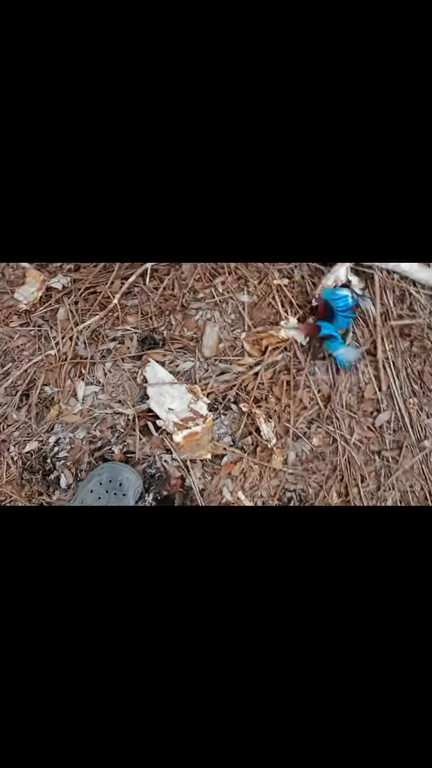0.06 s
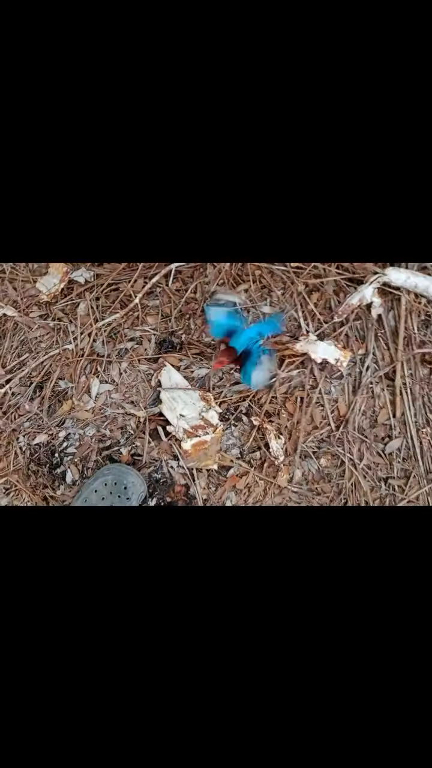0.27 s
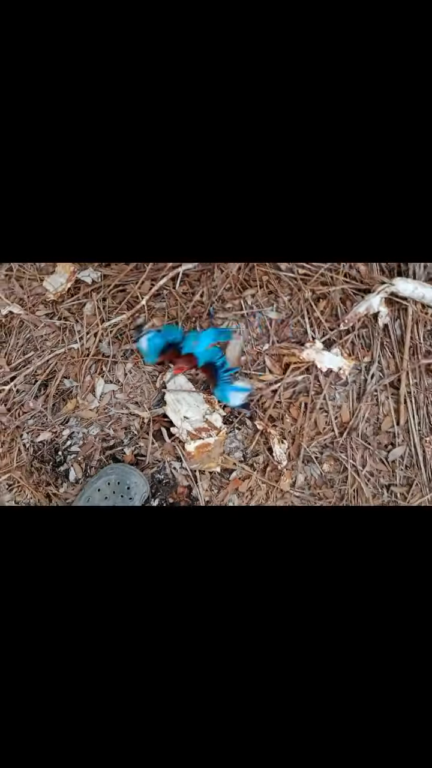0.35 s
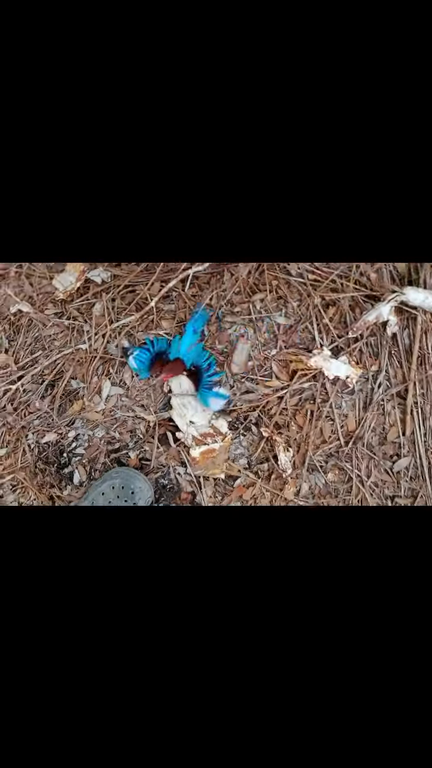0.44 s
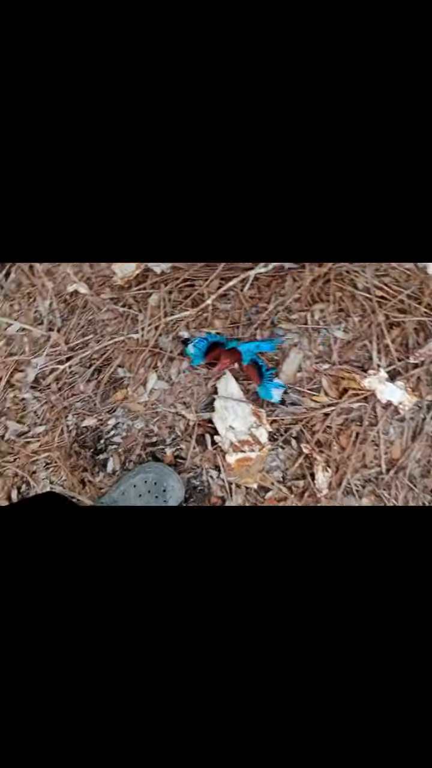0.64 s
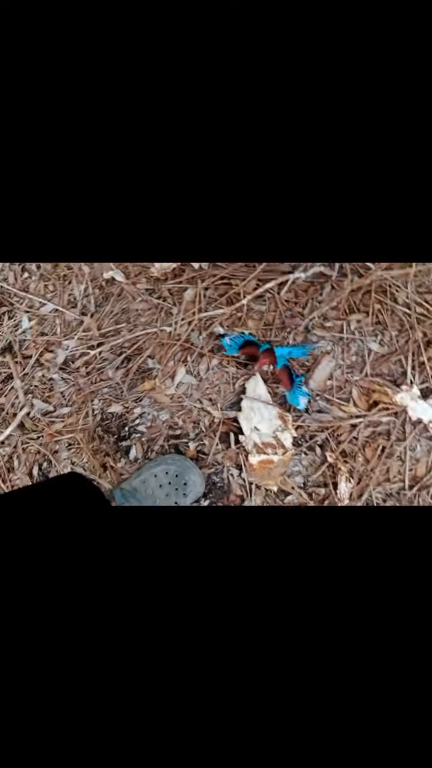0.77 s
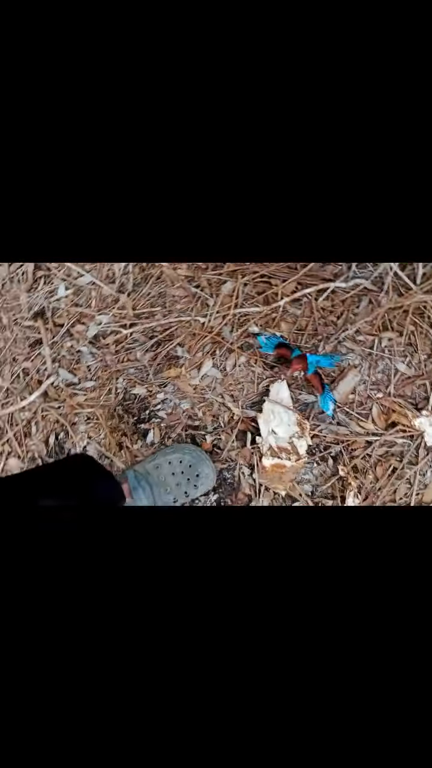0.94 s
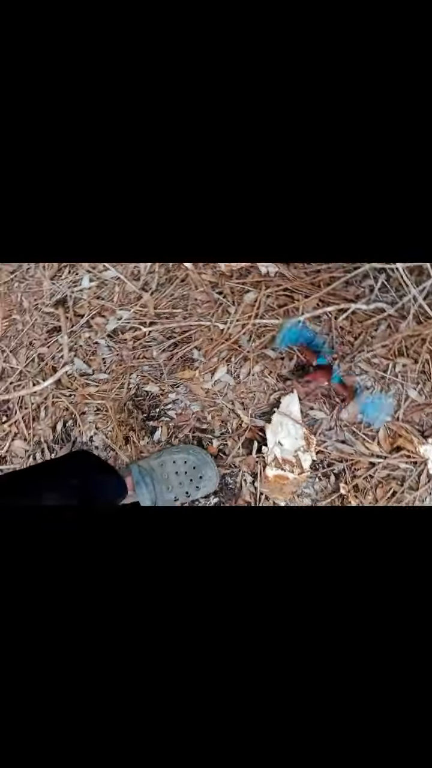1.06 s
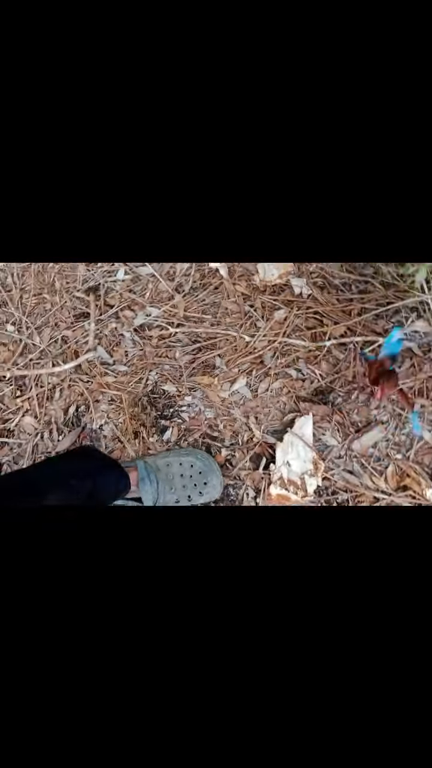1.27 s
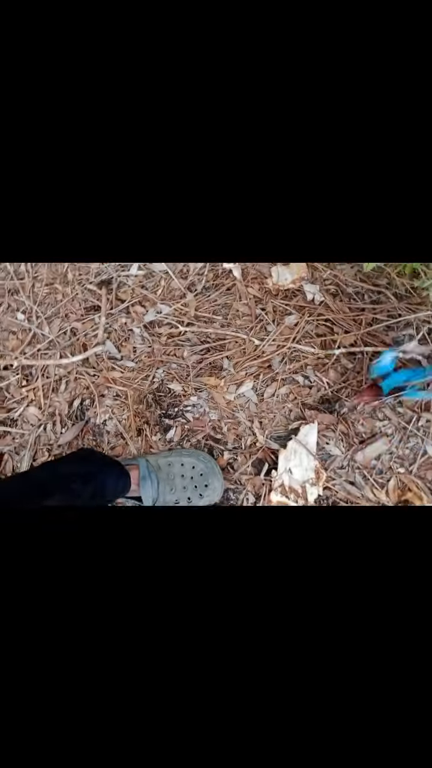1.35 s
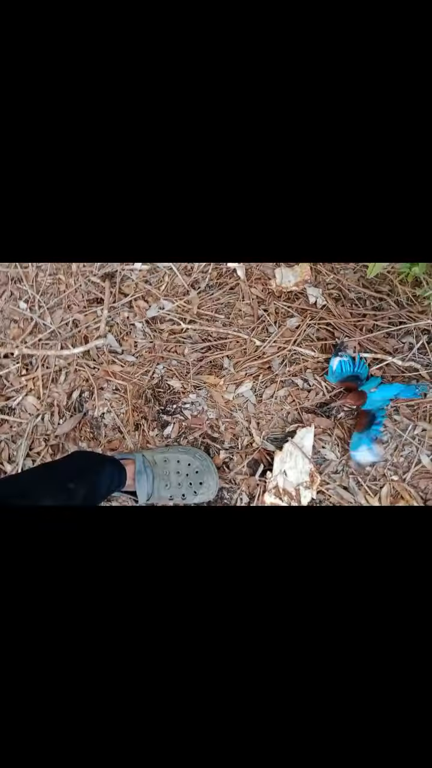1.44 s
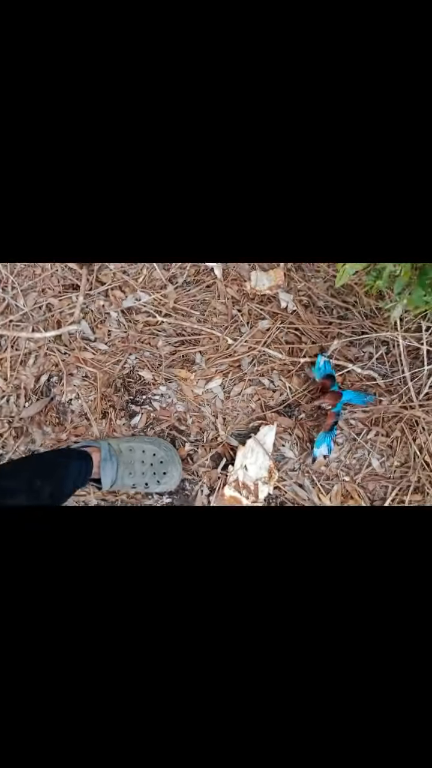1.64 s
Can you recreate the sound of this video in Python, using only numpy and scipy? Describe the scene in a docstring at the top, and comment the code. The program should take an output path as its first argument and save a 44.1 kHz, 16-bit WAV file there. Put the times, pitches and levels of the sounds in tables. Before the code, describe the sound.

Dry leaves rustle and twigs snap close by from about 0.1 seconds as a bird thrashes. Near 0.3 seconds it gives one short, harsh, reedy squawk over soft wingbeats. The crackling thins out, and faint, distant bird whistles follow around 0.8 seconds. A footstep crunches loudly at 1.0 to 1.1 seconds, then scrabbling and small snaps continue, fading by 1.7 seconds in quiet outdoor air.

```python
"""Dry leaves rustle close by as a bird thrashes on the litter, snapping twigs and beating its wings.
It lets out one short, harsh squawk, a reedy tone that jumps between a clean and a ragged register.
The leaves settle, a small bird whistles far off, then a footstep crunches and the bird scrabbles on.
The rustle is thousands of tiny fractures over a brushing noise; each snap is a crack and a wooden knock.
The trees give a faint echo, and a quiet bed of air lies under it all."""
import sys
import numpy as np
from scipy import signal
from scipy.fft import rfft, irfft, next_fast_len
from scipy.io import wavfile
from scipy.ndimage import uniform_filter1d, map_coordinates

SR = 44100
rng = np.random.default_rng(int(sys.argv[2]) if len(sys.argv) > 2 else 0)


def dump(signal):
    """Clip the signal to [-1, 1] and save it as 16-bit WAV at the path in sys.argv[1]."""
    limited = np.clip(np.atleast_2d(signal).T, -1, 1)
    pcm = np.round(limited * 32767).astype(np.int16)
    wavfile.write(sys.argv[1], SR, pcm)


N = 74970

# Tone of the still air: frequency_hz, gain_db
AIR_EQ = [(20, -19), (45, -9), (80, 3), (150, -8), (400, -16.5), (1500, -20.5), (2600, -16), (5000, -24.5),
          (15000, -39)]
# Fader rides for the four moves on the litter, before trim: time_s, leaf_db, twig_db
FLURRY_RIDE = [(0.008, -66.5, -86), (0.018, -49, -84), (0.032, -55, -71.5), (0.056, -47, -76),
               (0.082, -41.5, -50), (0.094, -31, -43), (0.106, -38.5, -48), (0.114, -32.5, -42.5),
               (0.132, -42, -50.5), (0.172, -41.5, -54.5), (0.18, -30.5, -35), (0.188, -26, -40.5),
               (0.206, -30, -49), (0.222, -49.5, -49.5)]
SETTLING_RIDE = [(.33, -60, -52), (0.377, -54, -81), (0.385, -40, -56), (.408, -41, -47),
                 (.422, -37, -43.5), (0.436, -32.5, -49.5), (0.451, -49, -61.5), (.495, -46, -57.5),
                 (0.514, -42.5, -57), (.55, -56.5, -62), (0.573, -42.5, -68), (.6, -54.5, -70.5),
                 (.66, -56.5, -71.5), (.73, -61, -78), (.77, -73, -91), (.94, -74, -95)]
FOOTSTEP_RIDE = [(0.955, -64.5, -93), (0.963, -55, -71), (0.991, -32.5, -43), (1.033, -25, -33.5),
                 (1.077, -31, -34.5), (1.083, -26, -31.5), (1.093, -26.5, -41), (1.113, -25.5, -31),
                 (1.142, -45.5, -65)]
SCRABBLE_RIDE = [(1.149, -37, -46), (1.18, -39.5, -47), (1.2, -44, -55), (1.245, -45, -54),
                 (1.266, -36, -52), (1.295, -40, -57), (1.325, -38, -44), (1.37, -42, -48.5),
                 (1.405, -40, -43), (1.431, -33.5, -44), (1.455, -40, -49.5), (1.5, -47, -56.5),
                 (1.527, -46, -55.5), (1.56, -49.5, -55.5), (1.605, -45.5, -60.5), (1.635, -54.5, -58),
                 (1.668, -53, -68), (1.68, -50.5, -69), (1.7, -54.5, -70)]
# Tone of crisp leaves, and of the twigs and soil beneath: frequency_hz, gain_db
LEAF_EQ = [(880, -36), (1500, -7), (1750, -9.5), (2220, -5.5), (2670, -4), (3410, -4.5), (3720, -5.5),
           (4660, -7.5), (8370, 1.5), (10200, -11), (12300, -17), (14900, -16.5), (15500, -17)]
TWIG_EQ = [(71, -25), (120, -21), (368, -13.5), (584, -1.5), (718, -5), (1150, 0.5), (1240, -1),
           (1660, -12.5), (2200, -5), (2860, -33), (4840, -120)]
# Echo decay among the trees: frequency_hz, t60_s
TREE_DECAY = [(200, 0.18), (1500, 0.36), (4000, 0.59), (9000, .5), (15000, 0.31)]
# Snapping stalks, before trim: start_s, crack_db, knock_db, knock_hz
SNAP_CUES = [(0.0925, -20, -46, 900), (0.114, -30, -33, 790), (0.1817, -14.5, -26.5, 480),
             (.194, -16.5, -32, 700), (.415, -37, -25.5, 496), (.4205, -14, -40, 770),
             (0.434, -21, -39, 1500), (0.486, -33, -55, 2000), (.575, -32, -58, 2000),
             (.6352, -24.5, -33.5, 1600), (.655, -31.5, -46, 1510), (0.6836, -53, -39, 1940),
             (.714, -36.5, -59, 1990), (.743, -42, -65, 3970), (.774, -34, -40, 1620),
             (.803, -44, -65, 4200), (.849, -42, -43.5, 3380), (0.8973, -46, -44, 4580),
             (1.0356, -18, -18.5, 975), (1.038, -12, -25, 1090), (1.078, -17, -36, 885),
             (1.083, -23.5, -14.5, 520), (1.0963, -22, -26, 700), (1.1043, -18, -23.5, 704),
             (1.113, -27.5, -16.5, 525), (1.1233, -18, -22.5, 557), (1.132, -19, -46, 900),
             (1.15, -20.5, -40, 695), (1.183, -18.5, -39, 810), (1.1995, -27, -45, 1190),
             (1.261, -29, -27, 1010), (1.273, -27.5, -27, 1100), (1.3131, -24, -27, 900),
             (1.321, -19.5, -24, 1720), (1.331, -22, -23, 750), (1.3425, -19, -15, 632),
             (1.357, -20, -26, 2200), (1.3949, -34, -24.5, 700), (1.4037, -21, -27, 1230),
             (1.434, -31, -29, 1930), (1.441, -21.5, -35, 800), (1.523, -30.5, -30.5, 1450),
             (1.531, -33, -32.5, 1190), (1.577, -41, -34, 2560), (1.609, -27, -31.5, 1540),
             (1.678, -30.5, -40, 1380)]
# Tone of a crack: frequency_hz, gain_db
CRACK_EQ = [(800, -21.5), (1500, -8.5), (2700, -4), (4600, -2.5), (8400, 0.5), (10200, -10.5),
            (12300, -24.5), (15500, -28)]
# Ringing modes of a twig: pitch_ratio, gain_db
TWIG_MODES = [(1, -0.5), (1.4, 0.5), (1.85, -1), (3, -6)]
# Hollow ground scrapes, and soft thuds of pushed air: peak_s, half_length_s, level_db
SCRAPE_CUES = [(.15, 0.019, -56), (.19, 0.015, -45), (.47, 0.025, -66), (1.095, .035, -43),
               (1.18, 0.037, -64.5), (1.425, 0.053, -54.5), (1.59, 0.047, -63)]
THUD_CUES = [(.192, .014, -48), (.252, 0.017, -36), (0.27, 0.0074, -38.5), (0.302, .016, -45),
             (1.092, 0.05, -54.5), (1.26, 0.022, -69)]
# Tone of a scrape and of a thud: frequency_hz, gain_db
SCRAPE_EQ = [(80, -24), (200, -8), (330, -4), (460, 2), (620, -6.5), (1200, -33), (3000, -69)]
THUD_EQ = [(20, -18), (60, -7), (110, -4), (200, -7.5), (400, -12.5), (1000, -13.5), (3000, -56)]
# The squawk's jumping voice: time_s, pitch_hz, roughness_share
SQUAWK_CONTOUR = [(.226, 1450, .9), (.239, 1800, .45), (.245, 1660, .2), (.2495, 1720, .2),
                  (.252, 1930, .45), (.2526, 2200, .2), (.257, 2245, .06), (.262, 2265, .02),
                  (.266, 2215, .08), (.2725, 2170, .12), (.2732, 1730, .2), (.277, 1680, .4),
                  (.279, 1750, .8), (.2815, 2130, .15), (.287, 2070, .1), (.2935, 1940, .3),
                  (.2955, 1450, .8), (.3, 1680, .35), (.3075, 1870, .12), (.309, 2260, .1),
                  (.316, 2220, .02), (.322, 2120, .12), (.3235, 1600, .3), (.336, 1400, .9)]
# Fader ride on its two resonances, before trim: time_s, low_db, high_db
SQUAWK_RIDE = [(.226, -34, -35), (.233, -29, -30), (.236, -35, -38), (.241, -22, -26), (.244, -18.5, -17),
               (.249, -16, -14), (.2515, -10.5, -20), (.255, -11.5, -17), (.259, -11.5, -28),
               (.2635, -12, -28), (.266, -18, -13), (.272, -24, -13.5), (.2745, -14, -18), (.28, -21, -20),
               (.286, -22, -19.5), (.292, -17, -17.5), (.296, -24, -20), (.301, -17, -16.5),
               (.307, -14, -20), (.31, -19, -15.5), (.318, -18, -15), (.322, -25, -14), (.325, -19, -21),
               (.329, -29, -25), (.336, -38, -39)]
# Period doubling in mid-squawk: time_s, doubling_share
DOUBLING_RIDE = [(.272, 0), (.281, 1), (.291, 1), (.298, 0)]
# Partials of the low resonance, the high one and the doubled period: pitch_ratio, gain_db
LOW_STACK = [(1, -33), (2, -10.5)]
HIGH_STACK = [(3, -5), (4, 4.5), (5, -0.5), (6, -3), (7, -16.5)]
DOUBLING_STACK = [(1.5, -10.5), (2.5, -17.5), (3, -5), (3.5, -5.5), (4.5, -10)]
# Tone of the bird's throat: frequency_hz, gain_db
THROAT_EQ = [(300, -36), (1600, -20.5), (2300, -6), (3200, 0.5), (4500, 1.5), (5300, -9), (6600, -3.5),
             (8300, 5.5), (9100, 1), (9550, -20), (11300, -16.5), (13300, -18), (16000, -28)]
# The far bird's notes: start_s, length_s, start_hz, end_hz, level_db
WHISTLE_CUES = [(0.784, .06, 2575, 2620, -57), (0.842, 0.043, 2598, 2570, -58),
                (0.878, 0.062, 3030, 2930, -64), (.92, 0.025, 2610, 2510, -65.5)]


def amp(db):
    """Decibels to gain."""
    return 10 ** (np.asarray(db) / 20)


def unit(x):
    """Scale to rms 1."""
    return x / np.sqrt(np.mean(x ** 2) + 1e-20)


def along(points, hz):
    """Read (frequency_hz, value) points on a log frequency axis."""
    frequencies, values = np.transpose(points)
    return np.interp(np.log(hz + 1), np.log(frequencies + 1), values)


def curves(rows):
    """One automation curve for each column after the time."""
    times, *columns = np.transpose(rows)
    return [np.interp(np.arange(N) / SR, times, column) for column in columns]


def wobble(knots_per_s):
    """A smooth random curve."""
    return map_coordinates(rng.standard_normal(N), [np.arange(N) * knots_per_s / SR], mode="wrap")


def coloured(x, eq):
    """Shape x with a minimum-phase EQ of power gain 1."""
    size = 2 * next_fast_len(N)
    gain = unit(amp(along(eq, np.fft.rfftfreq(size, 1 / SR))))
    cepstrum = irfft(np.log(np.maximum(gain, 1e-5)))
    cepstrum[1:size // 2] *= 2  # folded forward, so nothing rings ahead of a hit
    cepstrum[size // 2 + 1:] = 0
    return irfft(rfft(x, size) * np.exp(rfft(cepstrum)), size)[:N]


def noise(eq):
    """Coloured noise at rms 1."""
    return unit(coloured(rng.standard_normal(N), eq))


def swells(cues):
    """An envelope of soft, bell-shaped rises and falls."""
    t = np.arange(N) / SR
    return sum(amp(db) * np.exp(-((t - peak_s) / half_s) ** 2) for peak_s, half_s, db in cues)


def add(track, start_s, sound):
    """Mix a sound in at its cue."""
    part = track[max(0, round(start_s * SR)):][:len(sound)]
    part += sound[:len(part)]


def still_air(level_db=-71):
    """A steady bed of low rumble and faint hiss."""
    return amp(level_db) * noise(AIR_EQ)


def crackle(eq, grains_per_s, decay_cycles, spread_db=3.5, brush_gain=.75):
    """Tiny fractures, each with its own size and pitch, over a smooth brushing noise; rms 1."""
    count = int(grains_per_s * N / SR)
    t = np.arange(160) / SR
    onset, pick, phase = rng.random((count, 3)).T
    hz = eq[0][0] + pick * (eq[-1][0] - eq[0][0])
    size = amp(spread_db * np.clip(rng.standard_normal(count), -2, 2)) * np.sqrt(hz)
    cycles = hz[:, None] * t
    fade = np.exp(-cycles / decay_cycles) * (1 - t / t[-1])
    rings = size[:, None] * fade * np.sin(2 * np.pi * (cycles + phase[:, None]))
    places = (onset * N).astype(int)[:, None] + np.arange(len(t))
    grains = unit(np.bincount(places.ravel(), rings.ravel(), N)[:N])
    return unit(coloured(grains + brush_gain * rng.standard_normal(N), eq))


def rustle(trim_db=-.5, clump_db=1.27, clumps_per_s=160):
    """Wings and a shoe crush the litter in clumps: crisp leaves on top, duller twigs and soil beneath."""
    leaf_db, twig_db = curves(np.vstack([FLURRY_RIDE, SETTLING_RIDE, FOOTSTEP_RIDE, SCRABBLE_RIDE]))
    leaves = amp(leaf_db) * crackle(LEAF_EQ, grains_per_s=3200, decay_cycles=2)
    twigs = amp(twig_db) * crackle(TWIG_EQ, grains_per_s=1400, decay_cycles=2.5)
    return (leaves + twigs) * amp(trim_db + clump_db * wobble(clumps_per_s))


def tree_echo(x):
    """A diffuse tail off the trees, each frequency dying at its own speed."""
    hz, t, bands = signal.stft(rng.standard_normal(SR // 2), SR, nperseg=256)
    fade = amp(-60 * t / along(TREE_DECAY, hz)[:, None])
    _, tail = signal.istft(bands * fade, SR, nperseg=256)
    return signal.fftconvolve(x, tail / np.linalg.norm(tail))[:N]


def snaps(crack_trim_db=-6.5, knock_trim_db=-7, tail_db=-15, low_cut_hz=360):
    """Each breaking stalk gives a bright crack and a short wooden knock with no bass."""
    crack_t60_s, tail_t60_s, knock_t60_s = .0051, .03, .013
    cracks, knocks = np.zeros((2, N))
    t = np.arange(SR // 20) / SR
    crack_fade = amp(-60 * t / crack_t60_s) + amp(tail_db - 60 * t / tail_t60_s)
    for start_s, crack_db, knock_db, knock_hz in SNAP_CUES:
        add(cracks, start_s, amp(crack_db + crack_trim_db) * crack_fade * rng.standard_normal(len(t)))
        ring = np.zeros(len(t))
        for i, (ratio, db) in enumerate(TWIG_MODES):
            mode_hz = ratio * knock_hz * np.exp(rng.normal(0, .044))  # each twig is a little detuned
            ring += (-1) ** i * amp(db) * np.cos(2 * np.pi * mode_hz * t)
        add(knocks, start_s, amp(knock_db + knock_trim_db - 60 * t / knock_t60_s) * ring)
    low_cut = signal.butter(2, low_cut_hz, "high", fs=SR, output="sos")
    return coloured(cracks, CRACK_EQ) + signal.sosfilt(low_cut, knocks)


def thuds_and_scrapes():
    """Wingbeats and the footfall push air and scrape the hollow ground."""
    return swells(THUD_CUES) * noise(THUD_EQ) + swells(SCRAPE_CUES) * noise(SCRAPE_EQ)


def squawk(start_s=.2255, end_s=.337, trim_db=-1, rasp_db=7):
    """A reedy tone, clean up high and ragged down low, through two throat resonances."""
    jitter, shimmer, flutter_hz = .0817, .73, 1500  # pitch and level scatter at full roughness; rate
    pitch_hz, roughness = curves(SQUAWK_CONTOUR)
    low_db, high_db = curves(SQUAWK_RIDE)
    doubling, = curves(DOUBLING_RIDE)
    ragged_hz = pitch_hz * (1 + jitter * roughness * wobble(flutter_hz))
    phase = 2 * np.pi * np.cumsum(ragged_hz) / SR

    def through_throat(stack):
        """A stack of fluttering partials shaped by the throat, and its rms without the flutter."""
        tone, power = np.zeros((2, N))
        for ratio, db in stack:
            gain = amp(db + along(THROAT_EQ, ratio * pitch_hz))
            flutter = 1 + shimmer * roughness * wobble(2 * flutter_hz)
            tone += gain * flutter * np.sin(ratio * phase)
            power += gain ** 2 / 2
        return tone, np.sqrt(power)

    voice = np.zeros(N)
    for stack, level_db in (LOW_STACK, low_db), (HIGH_STACK, high_db):
        tone, rms = through_throat(stack)
        voice += amp(level_db + trim_db) * tone / rms
    subtones, _ = through_throat(DOUBLING_STACK)
    voice += doubling * amp(high_db) * subtones
    rasp = amp(rasp_db + low_db) * roughness * noise(THROAT_EQ)
    t = np.arange(N) / SR
    soft_gate = uniform_filter1d(1. * ((t > start_s) & (t < end_s)), size=64)
    return (voice + rasp) * soft_gate


def far_bird(waver_share=.018, waver_hz=200, echo_db=-7):
    """Thin, wavering whistles, blurred by the trees."""
    whistles = np.zeros(N)
    for start_s, length_s, start_hz, end_hz, db in WHISTLE_CUES:
        progress = np.linspace(0, 1, int(length_s * SR))
        waver = 1 + waver_share * wobble(waver_hz)[:len(progress)]
        hz = np.interp(progress, [0, 1], [start_hz, end_hz]) * waver
        arch = np.sqrt(np.abs(np.sin(np.pi * progress)))
        add(whistles, start_s, amp(db) * arch * np.sin(2 * np.pi * np.cumsum(hz) / SR))
    return whistles + amp(echo_db) * tree_echo(whistles)


def scene(echo_db=-24.5):
    """The mono mix: close sounds and their echo, thuds and scrapes, the far bird and still air."""
    near = squawk() + rustle() + snaps()
    air = still_air()
    return (near + amp(echo_db) * tree_echo(near) + thuds_and_scrapes() + far_bird() + air)[None]


def record(dry):
    """A soft clip rounds off the highest peaks, then a steep high cut takes off the very top."""
    ceiling, top_hz, taper_hz = .52, 15900, 400
    rounded = dry / (1 + np.abs(dry / ceiling) ** 8) ** (1 / 8)
    size = next_fast_len(N + SR // 2)
    passband = np.clip((top_hz - np.fft.rfftfreq(size, 1 / SR)) / taper_hz, 0, 1)
    return irfft(rfft(rounded, size) * passband, size)[..., :N]


dry = scene()
out = record(dry)
dump(out)
```